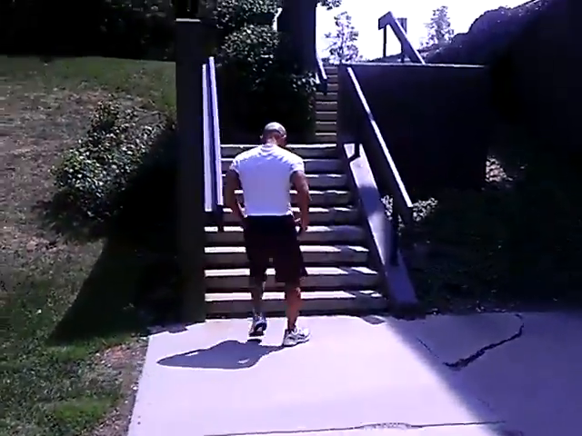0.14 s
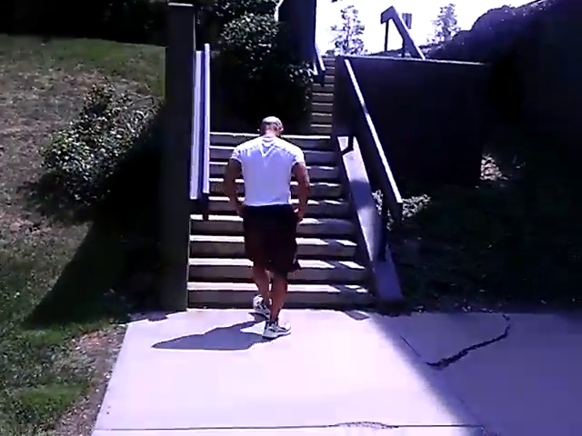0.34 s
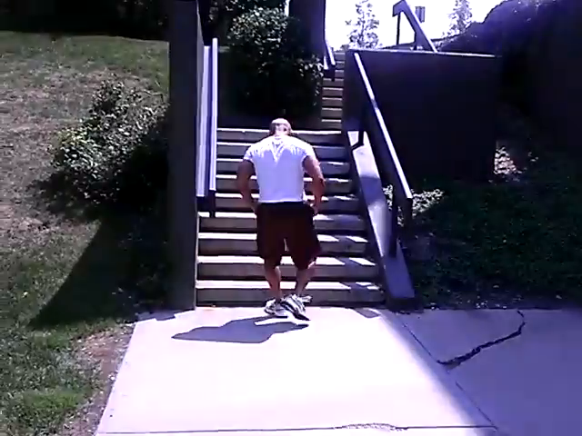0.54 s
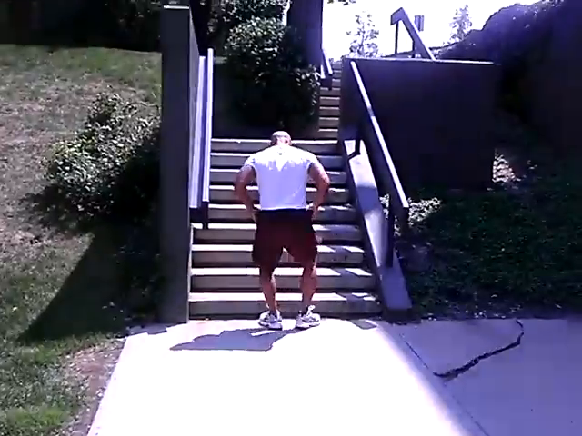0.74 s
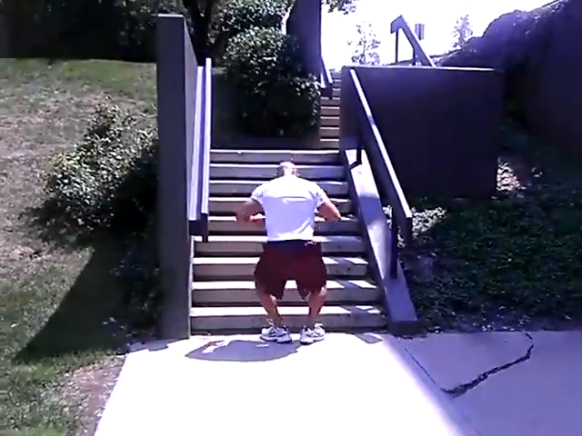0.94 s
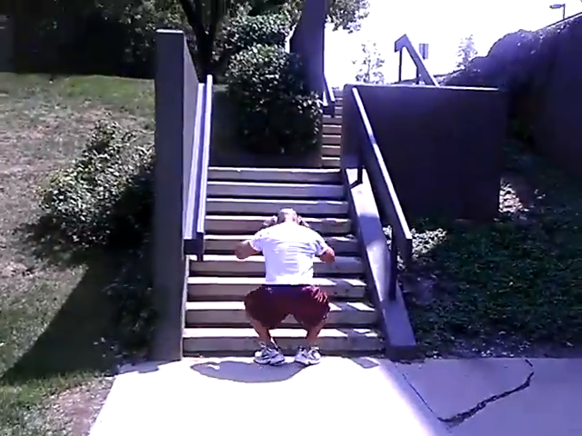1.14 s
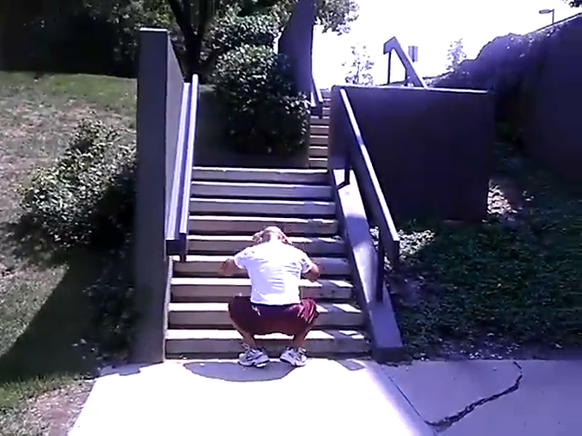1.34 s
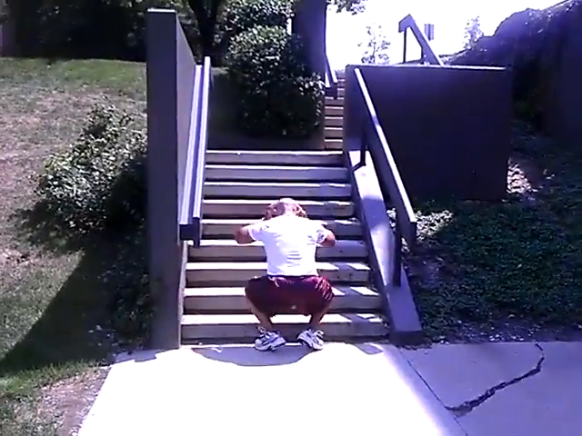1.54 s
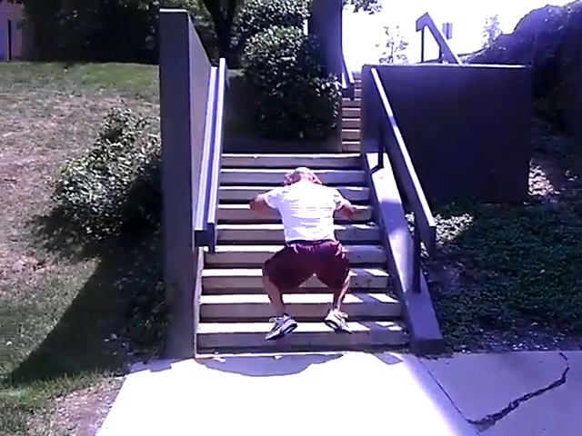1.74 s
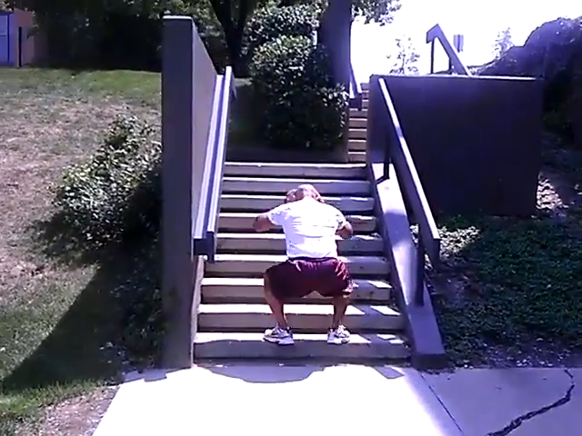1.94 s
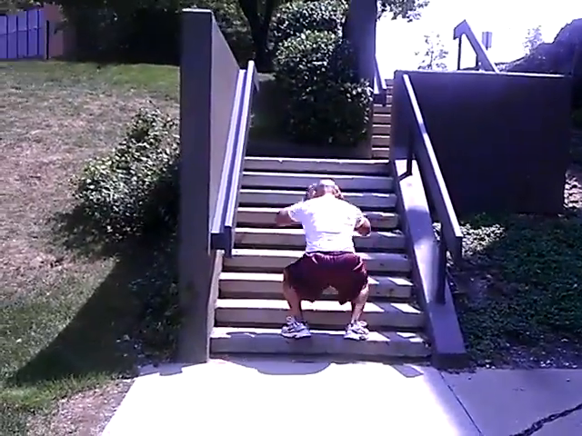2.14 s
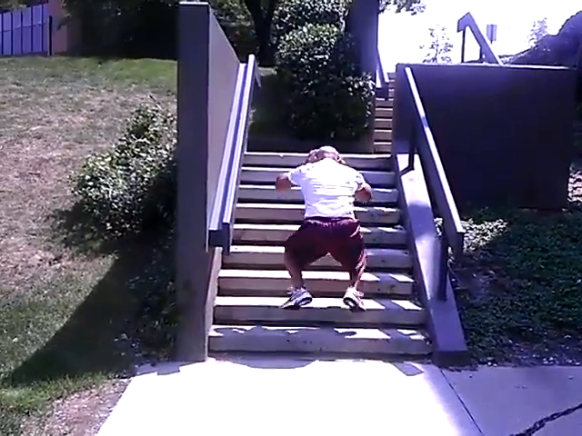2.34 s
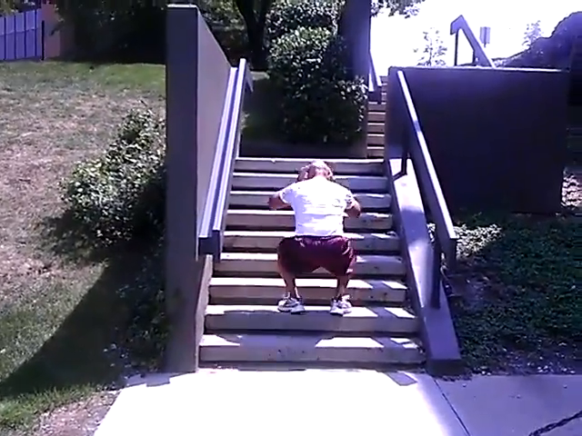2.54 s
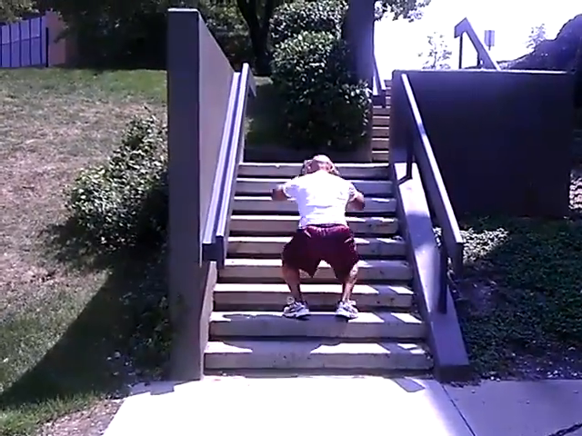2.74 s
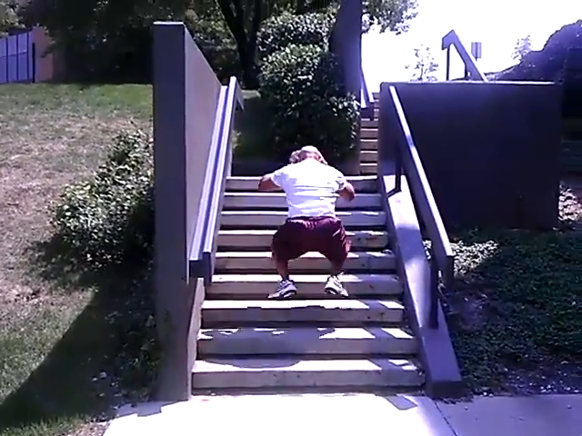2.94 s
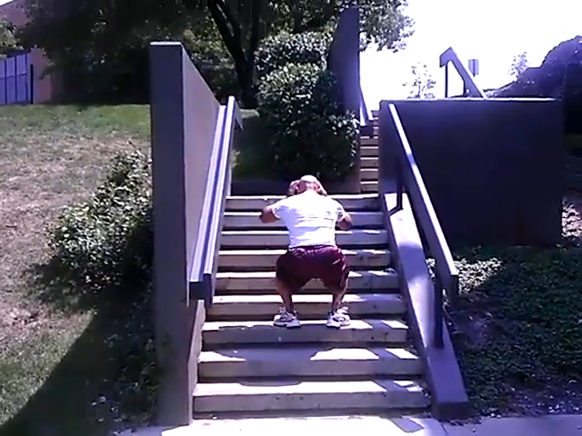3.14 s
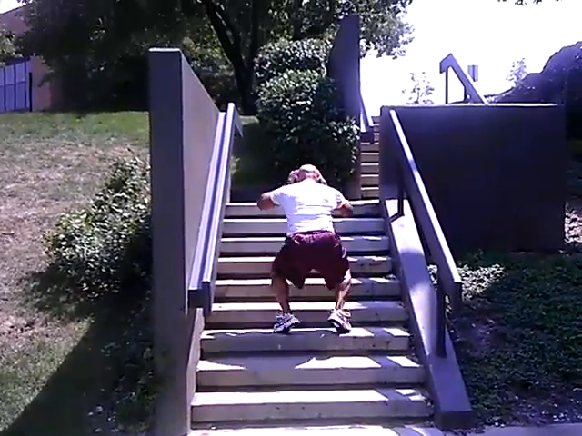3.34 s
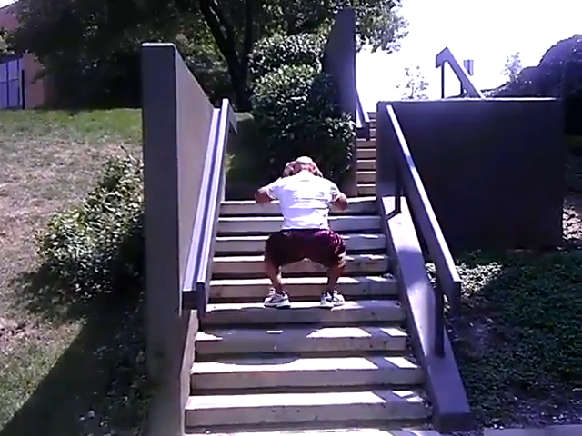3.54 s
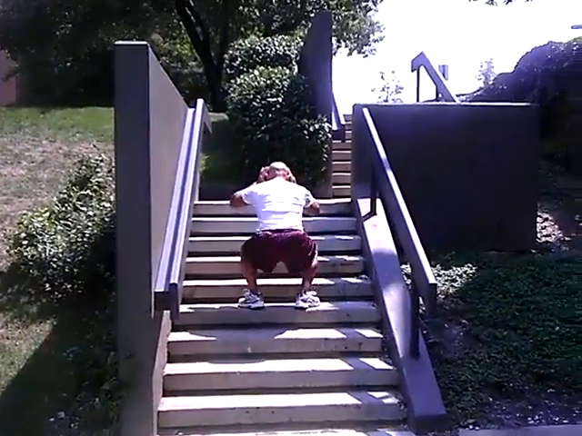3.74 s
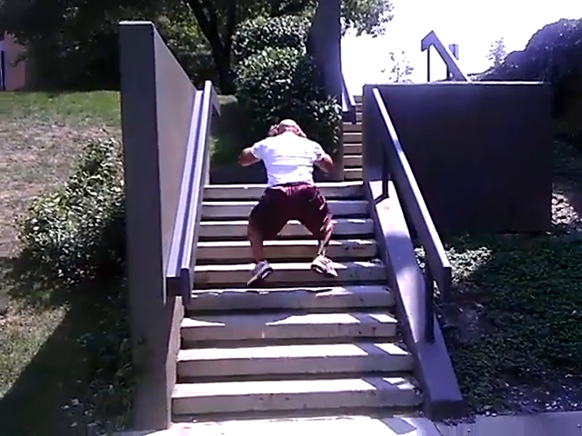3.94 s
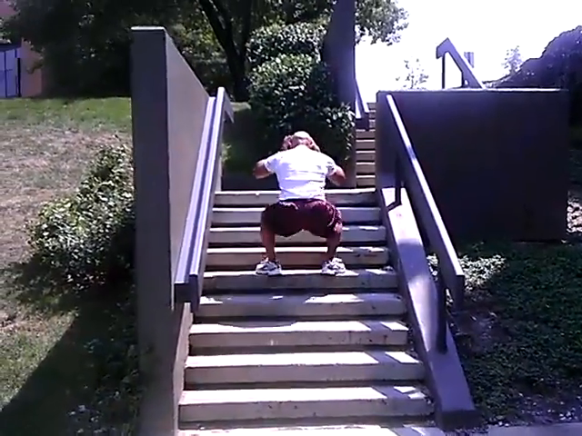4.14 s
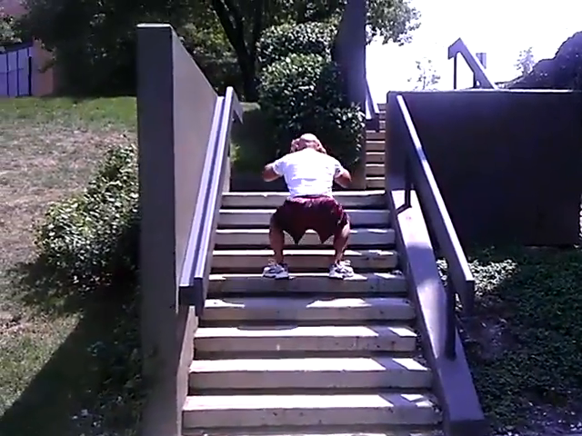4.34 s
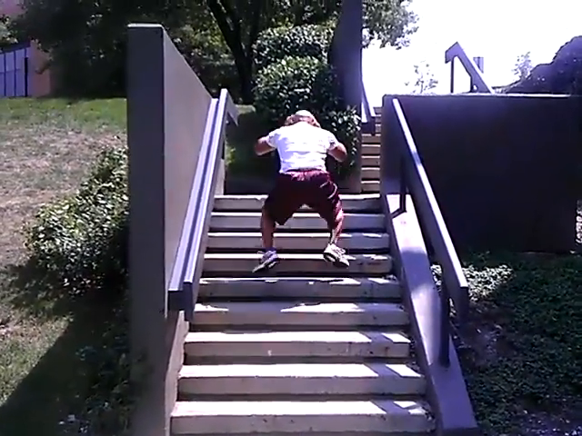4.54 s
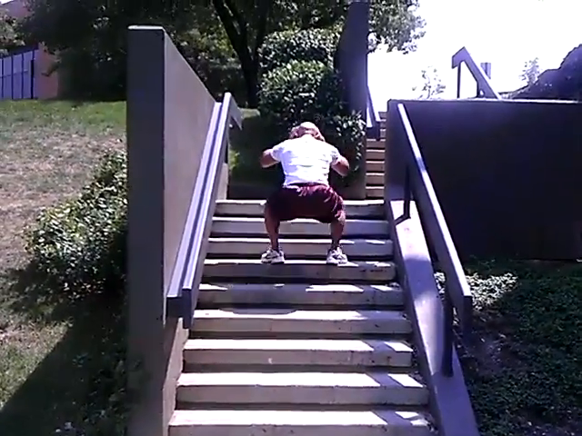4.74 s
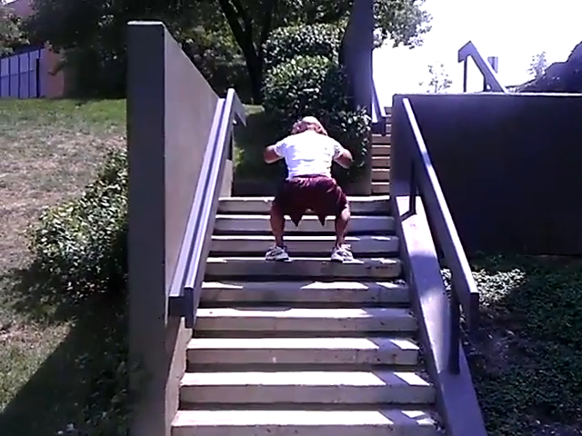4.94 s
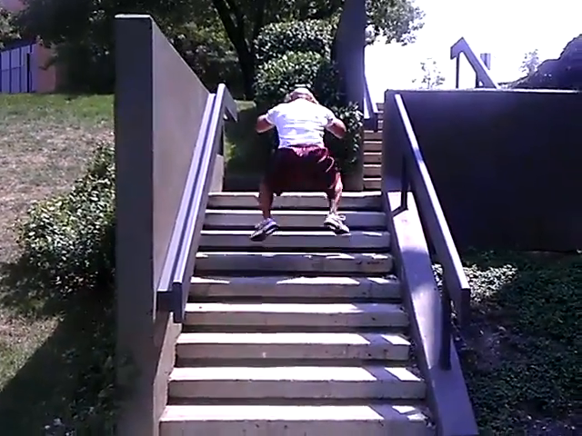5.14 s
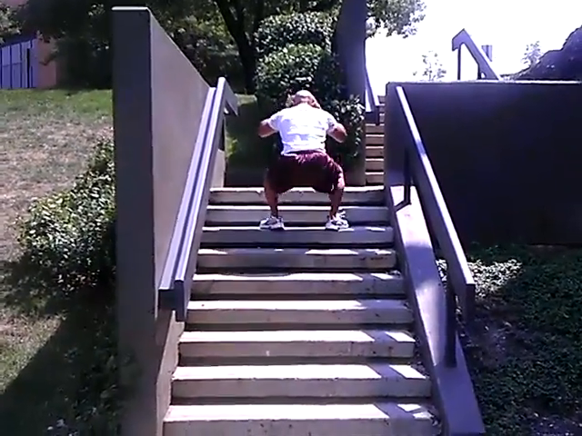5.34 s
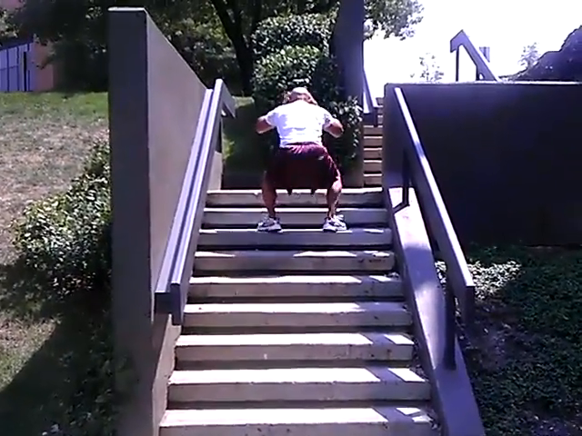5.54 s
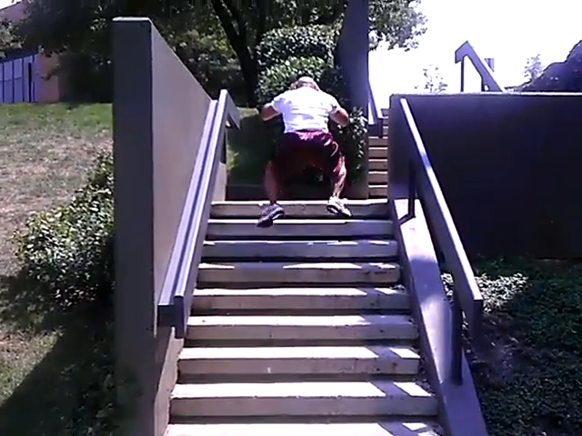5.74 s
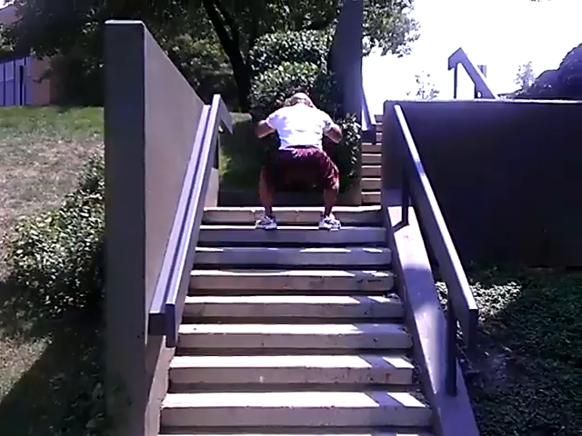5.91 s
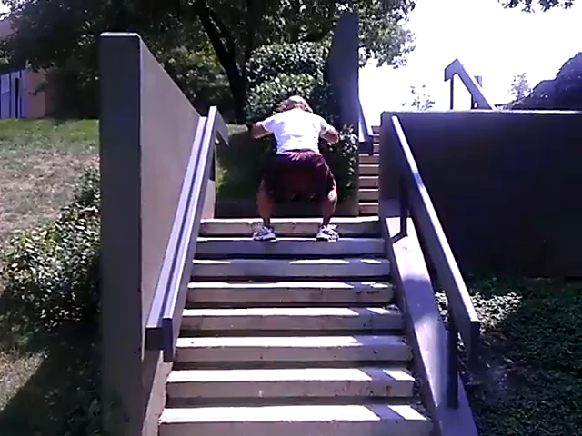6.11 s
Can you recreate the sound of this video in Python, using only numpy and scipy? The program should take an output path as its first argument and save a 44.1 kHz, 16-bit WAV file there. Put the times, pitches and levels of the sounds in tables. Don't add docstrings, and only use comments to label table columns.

```python
import sys
import numpy as np
from scipy import signal
from scipy.fft import rfft, irfft
from scipy.io import wavfile

SR = 44100
rng = np.random.default_rng(int(sys.argv[2]) if len(sys.argv) > 2 else 0)


def undo_db(level):
    steps = np.asarray(level, float) / 20
    return 10 ** steps


def store_pcm(level_fs):
    pcm = np.round(np.clip(level_fs, -1, 1) * 32767).astype(np.int16)
    wavfile.write(sys.argv[1], SR, np.atleast_2d(pcm).T)


N = 272348

# [t/s, level/dB]
TOWN_SWELL = [(0.0, -46), (0.3, -49), (1.1, -46.5), (2.36, -47.5), (3.3, -46), (4.25, -44), (4.6, -45),
              (6.18, -44)]
# [f/Hz, level/dB per Hz]
RUMBLE_COLOUR = [(40, -14), (75, -5), (93, -11.5), (119, -0.5), (187, -12), (219, -9.5), (300, -13),
                 (980, -22)]
# [f/Hz, level/dB per Hz]
AIR_COLOUR = [(980, -20.5), (2400, -32.5), (3000, -36.5), (4400, -44.5), (6200, -85.5), (9000, -48.5)]
# [f/Hz, side minus mid level/dB]
SIDE_SHARE = [(60, -32), (110, -49.5), (190, -20), (330, -13), (580, -11.5), (1010, -5), (3140, -1),
              (9740, 3.5)]
# [t/s, firing f/Hz, level/dB]
ENGINE_RUN = [(0.0, 114.9, -45.5), (0.53, 112.4, -68), (0.7, 99.1, -47.5), (1.17, 104, -45),
              (1.67, 113.1, -46), (2.25, 117.5, -44), (2.41, 113.4, -45.5), (2.65, 115.7, -44.5),
              (3.5, 116, -50.5), (3.65, 124.2, -50), (4.02, 123.3, -51), (4.15, 124.1, -42),
              (4.35, 129.3, -47), (4.88, 125.7, -42.5), (5.47, 126.3, -35.5), (5.6, 127.3, -42),
              (6.18, 131.1, -30)]
# [multiple of firing f, level/dB]
ENGINE_ORDERS = [(.75, -55), (1, -1), (2, -17), (2.5, -16.5)]
# [t/s, level/dB, f/Hz, length/s]
CHIRPS = [
    (0.833, -75, 4600, 0.056),
    (0.961, -69, 4460, 0.058),
    (2.67, -68.5, 5370, 0.038),
    (4.496, -74, 4600, .03),
    (5.51, -86, 5500, 0.036),
    (5.721, -68, 5860, 0.019),
]
# [delay/s, level/dB]
ECHOES = [
    (0.059, -15),
    (0.085, -34),
    (.110, -26.5),
    (.150, -26.5),
]
# (f/Hz, width/Hz, depth 0-1)
GROUND_DIP = (3020, 830, 0.42)
# [t/s, peak level/dB, f/Hz]
LONE_TICKS = [
    (0.5756, -36, 5830),
    (1.3263, -38, 3370),
    (1.4277, -32.5, 2550),
    (2.172, -49, 4630),
    (4.2061, -12.5, 4650),
    (4.8152, -16.5, 4200),
]
# [t/s, drag level/dB, length/s, first grain level/dB, f/Hz]
DRAGS = [(0.05, -39.5, 0.019, -60, 3720), (0.069, -33, 0.018, -28, 3500), (0.092, -37, 0.011, -29, 6640),
         (0.125, -47, .028, -45, 3880), (0.783, -36, 0.021, -34, 990), (0.89, -48, 0.028, -60, 2470),
         (0.93, -46, 0.025, -60, 2356), (1.634, -48.5, .036, -42, 4146), (1.725, -40, 0.021, -50, 3320),
         (1.758, -45, 0.031, -47, 5860), (1.895, -50, 0.022, -50, 6080), (2.334, -48.5, 0.029, -45, 4180),
         (2.355, -44, 0.014, -60, 4530), (2.901, -46.5, 0.045, -34, 6200), (3.452, -46.5, 0.053, -36, 6000),
         (3.48, -70, 0.013, -58, 5000), (4.023, -51.5, 0.047, -38.5, 5850), (4.089, -51, .026, -63, 6000),
         (4.617, -49, 0.018, -66, 5000), (5.19, -47, 0.015, -54, 3800), (5.752, -47.5, 0.028, -45, 3360)]
# [t/s, slap peak level/dB, slap f/Hz, thud level/dB, thud f/Hz]
FEET = [(1.973, -25, 1470, -26.5, 308), (1.984, -19, 840, -21.5, 177), (2.557, -5, 2180, -19, 277),
        (2.573, -16.5, 2120, -34.5, 186), (3.105, -3.5, 1550, -15, 428), (3.118, -7.5, 2150, -22, 401),
        (3.648, -15, 1350, -21.5, 196), (3.659, -8.5, 1850, -18, 190), (4.206, -10, 1057, -12.5, 247),
        (4.220, -10, 2160, -19.5, 245.1), (4.814, -9.5, 1497, -16.5, 227), (4.832, -10, 930, -22, 173),
        (5.375, -10.5, 1357, -16.5, 255.3), (5.395, -12, 1350, -17, 223), (5.974, -9, 1390, -16.5, 235),
        (5.992, -9, 1010, -20.5, 226)]
# [f/Hz, level/dB]
SAND_MODES = [(2500, 0), (3700, 5), (4800, 3.5), (6200, 2.5), (7500, 1), (8700, 0)]
BAND_DROPOUTS = [
    (1.982, .044, 7300, 12000),
    (4.214, .066, 8400, 12000),
    (4.860, .028, 7000, 12000),
    (5.287, .065, 5900, 7200),
    (5.610, .065, 6300, 6900),
    (5.890, .066, 6300, 6900),
    (5.985, .035, 8400, 12000),
    (6.020, .070, 7600, 12000),
]

AIR_DB, AIR_FOLLOWS = -9.5, 1.4
GRAIN_LAG_S, RUBBER_HZ = 0.003, 2530
HEEL_LAG_S, HEEL_SLAP_DB, HEEL_PITCH = 0.0035, -5, 0.65
TOE_THUD_DB, TOE_PITCH = -12.5, 1.2
GRIT_DB, GRIT_FADE_DB_PER_S, HEEL_GRIT_DB = -14.5, 1.5, -8
SECOND_GRIT_DB = -2
SLAP_T60_S = 0.0028
MUTE_LEAD_S, MUTE_S, MUTE_FROM_HZ = 0.014, 0.012, 4300
BASS_CUT_HZ, TOP_CUT_HZ = 115, 8900
HISS_DB, HISS_HZ = -57, 7900
SUBSONIC_DB = -49


def rms_one(x):
    return x / np.sqrt(np.mean(x ** 2) + 1e-20)


def in_time(rows):
    s, *columns = np.transpose(rows)
    return [np.interp(np.arange(N) / SR, s, c) for c in columns]


def at_hz(points, hz):
    curve_hz, level_db = np.transpose(points)
    return np.interp(np.log(np.maximum(hz, 1)), np.log(curve_hz), level_db)


def drift(rate):
    r = np.exp(-80 * np.pi * rate / SR)
    white = rng.standard_normal(N // 40 + 2002)
    slow = signal.lfilter([1], [1, -2 * r, r * r], white)[2000:]
    return np.interp(np.arange(N) / 40, np.arange(len(slow)), rms_one(slow))


def ring(x, hz, t60):
    r, w = undo_db(-60 / (t60 * SR)), 2 * np.pi * hz / SR
    return signal.lfilter([0, np.sin(w)], [1, -2 * r * np.cos(w), r * r], x)


def butter(order, hz, kind, x):
    return signal.sosfilt(signal.butter(order, hz, kind, fs=SR, output="sos"), x)


def add(track, s, piece):
    at = round(s * SR)
    track[at:at + len(piece)] += piece[:N - at]


def grains(size, spread_db):
    height_db = spread_db * np.minimum(rng.exponential(1, size), 4)
    return rms_one(undo_db(height_db) * rng.choice([-1, 1], size))


def town():
    rumble_db, = in_time(TOWN_SWELL)
    air_db = rumble_db.mean() + AIR_DB + AIR_FOLLOWS * (rumble_db - rumble_db.mean())
    layers, together = np.zeros((2, 2, N)), drift(0.51)
    edges, white = np.geomspace(40, 9300, 19), rng.standard_normal((2, 2, N))
    for k, (low, high) in enumerate(zip(edges, edges[1:])):
        mid, side = butter(2, [low, high], "band", white[k % 2])
        hz = np.sqrt(low * high)
        colour = AIR_COLOUR if hz > AIR_COLOUR[0][0] else RUMBLE_COLOUR
        flicker_db = 2.38 * (0.1 * together + drift(8.4)) + 1.8 * (hz > 4000) * drift(11)
        gain = undo_db(at_hz(colour, hz) + flicker_db)
        layers[int(hz > 1000)] += gain * np.array([mid, undo_db(at_hz(SIDE_SHARE, hz)) * side])
    rumble, air = (layer / layer[0].std() for layer in layers)
    mid, side = undo_db(rumble_db + 2.5) * rumble + undo_db(air_db - 1.3) * air
    return np.array([mid + side, mid - side])


def engine():
    hz, level_db = in_time(ENGINE_RUN)
    turns = np.cumsum(hz * (1 + 0.0095 * drift(10.54))) / SR
    tones = np.zeros(N)
    for multiple, db in ENGINE_ORDERS:
        tones += undo_db(db + 2.2 * drift(7.0)) * np.sin(2 * np.pi * multiple * turns)
    return np.sqrt(2) * undo_db(level_db) * tones


def bird():
    out = np.zeros(N)
    for s, db, hz, length in CHIRPS:
        t = np.arange(round(length * SR)) / SR
        whistle = ring(ring(rng.standard_normal(len(t)), hz, 0.0066), hz, 0.0066)
        add(out, s, undo_db(db + 4) * np.sin(np.pi * t / length) ** 0.32 * rms_one(whistle))
    return out


def returns(first, per_s, hold, t60, thin_hz, dull_hz, level_db):
    size = 2 ** 15
    t, hz = np.arange(size) / SR, np.arange(1, size // 2 + 2) * SR / size
    dying = undo_db(-60 * np.maximum(t - hold, 0) / t60) * (t > first)
    taps = (rng.random((2, size)) < per_s / SR) * rng.standard_normal((2, size)) * dying
    taps = taps / np.sqrt(np.sum(taps ** 2, axis=1, keepdims=True))
    colour = 1 / (1 + 1j * hz / dull_hz) / (1 - 1j * thin_hz / hz)
    mid, side = rfft(taps) * colour
    side = side * undo_db(at_hz(SIDE_SHARE, hz) + 3.0)
    return undo_db(level_db) * irfft(np.array([mid + side, mid - side]), size)


def echoes(x):
    dull, out = signal.lfilter([0.5], [1, -0.5], x), np.zeros(N)
    for delay, db in ECHOES:
        add(out, delay, undo_db(db) * dull)
    return out


def ticks():
    out, t = np.zeros(N), np.arange(400) / SR
    drag_grains = [(s + GRAIN_LAG_S, db, hz) for s, _, _, db, hz in DRAGS]
    for s, peak_db, hz in list(LONE_TICKS) + drag_grains:
        crack = grains(len(t), 0.92) * np.exp(-t / 0.0012)
        snap = np.diff(crack, prepend=0) * 0.33 + ring(crack, hz, 11.0 / hz) + 1.1 * ring(crack, 1700, 0.0011)
        add(out, s, undo_db(peak_db - 3.5) * snap / np.abs(snap).max())
    return out


def scuffs():
    out, t = np.zeros(N), np.arange(4000) / SR
    for s, peak_db, length, _, hz in DRAGS:
        swell = (t / (0.18 * length)) * np.exp(1 - t / (0.36 * length))
        sand = grains(len(t), 1.7) * swell
        broad = butter(1, [1200, 7000], "band", sand)
        scrape = broad + 0.15 * ring(sand, hz, 7.9 / hz) + 0.11 * ring(sand, RUBBER_HZ, 0.0041)
        add(out, max(s - 0.004, 0), undo_db(peak_db - 13.5) * scrape)
    return out


def contacts():
    rows = []
    for k, (s, slap_db, slap_hz, thud_db, thud_hz) in enumerate(FEET):
        grit_db = slap_db + GRIT_DB - GRIT_FADE_DB_PER_S * (s - FEET[0][0]) + SECOND_GRIT_DB * (k % 2)
        toe = (s, slap_db, slap_hz, thud_db + TOE_THUD_DB, TOE_PITCH * thud_hz, grit_db)
        heel = (s + HEEL_LAG_S, slap_db + HEEL_SLAP_DB, HEEL_PITCH * slap_hz,
                thud_db, thud_hz, grit_db + HEEL_GRIT_DB)
        rows += [toe, heel]
    return rows


def landings():
    out, t = np.zeros(N), np.arange(2600) / SR
    for s, slap_db, slap_hz, thud_db, thud_hz, grit_db in contacts():
        tread = grains(len(t), 3.94) * (1 - np.exp(-t / 0.0014)) * np.exp(-t / 0.0017)
        slap = ring(tread, slap_hz, SLAP_T60_S) + 0.6 * ring(tread, 703, 0.0044)
        slap -= 0.32 * ring(tread, 970, 0.004) + 0.34 * ring(tread, 2240, 0.0037)
        push = np.sin(2 * np.pi * np.clip((t - 0.0015) * thud_hz * 0.81, 0, 1))
        thud = ring(push, thud_hz, 0.028) + 0.52 * ring(push, 1.2 * thud_hz, 0.038)
        sand = grains(len(t), 2.6) * (1 - np.exp(-t / 0.00014)) * np.exp(-t / 0.0086)
        grit = np.zeros(len(t))
        for k, (hz, db) in enumerate(SAND_MODES):
            grit += undo_db(db) * ring(sand, hz, 7.7 / hz) * (-1) ** k
        for part, level_db in ((slap, slap_db - 1.0), (thud, thud_db + 5.0), (grit, grit_db + 2.5)):
            add(out, s, undo_db(level_db) * part / np.abs(part).max())
    return out


def scene():
    dip_hz, width_hz, depth = GROUND_DIP
    feet, snaps = landings() + scuffs(), ticks()
    feet = feet - min(depth, 0.95) * signal.lfilter(*signal.iirpeak(dip_hz, dip_hz / width_hz, fs=SR), feet)
    feet = butter(2, 120, "high", feet)
    stairwell = returns(first=0.0038, per_s=3500, hold=0.016, t60=0.046, thin_hz=257, dull_hz=9000, level_db=-3.5)
    yard = returns(first=0.02, per_s=5900, hold=0.014, t60=0.31, thin_hz=90, dull_hz=905, level_db=-11.0)
    back = echoes(feet)
    send = feet + 0.73 * back + undo_db(-13) * snaps
    wet = signal.fftconvolve(send[None], stairwell + yard, axes=1)[:, :N]
    direct = (feet + 0.51 * back + snaps) * undo_db([[0.7], [-0.7]])
    return direct + wet + town() + engine() + bird()


def dropouts(x):
    out, margin = x.copy(), 200
    before_landings = [(foot[0] - MUTE_LEAD_S, MUTE_S, MUTE_FROM_HZ, 12000) for foot in FEET[2::2]]
    for s, length, low_hz, high_hz in before_landings + list(BAND_DROPOUTS):
        start, stop = round(s * SR) - margin, round((s + length) * SR)
        bandpass = signal.butter(6, [low_hz, high_hz], "band", fs=SR, output="sos")
        band = signal.sosfiltfilt(bandpass, out[:, start:stop])
        out[:, start:stop] -= band * signal.windows.tukey(stop - start, min(2 * margin / (stop - start), 1))
    return out


def low_pass(x):
    return signal.sosfilt(signal.butter(12, 10340, fs=SR, output="sos"), x)


def record(dry):
    white = rng.standard_normal((2, *dry.shape))
    hiss = butter(2, HISS_HZ, "high", white[0])
    subsonic = butter(1, 45, "low", white[1])
    thin = butter(2, BASS_CUT_HZ, "high", dry)
    noisy = thin + undo_db(HISS_DB) * hiss + undo_db(SUBSONIC_DB) * subsonic
    steep = signal.ellip(10, 0.1, 45, 0.995 * TOP_CUT_HZ, fs=SR, output="sos")
    cut = signal.sosfilt(steep, noisy)
    skirt = butter(8, 1.07 * TOP_CUT_HZ, "low", thin)
    rounded = 1.181 * np.tanh((cut + undo_db(-24) * skirt) / 1.24)
    fade = np.minimum(np.arange(N)[::-1] / 60, 1)
    return low_pass(fade * dropouts(rounded))


dry = scene()
out = record(dry)
store_pcm(out)
```